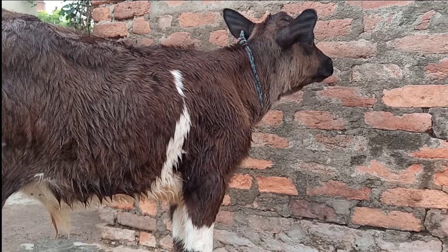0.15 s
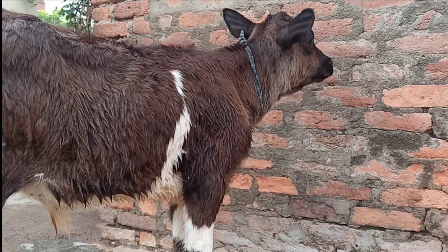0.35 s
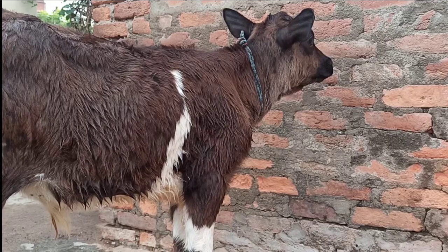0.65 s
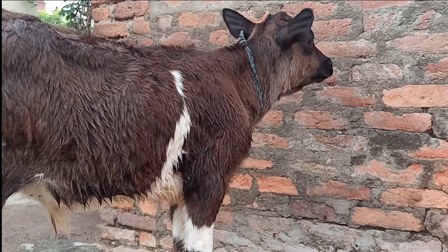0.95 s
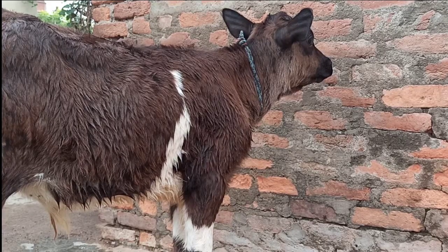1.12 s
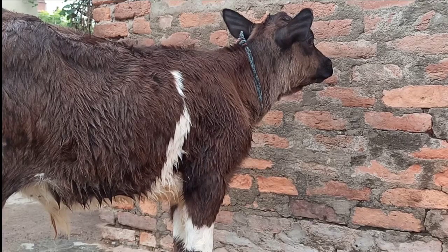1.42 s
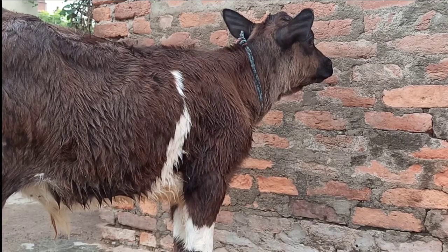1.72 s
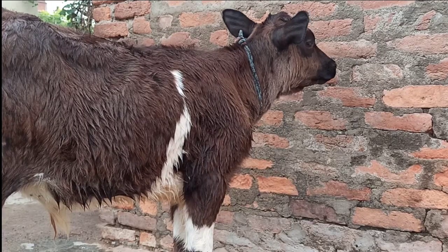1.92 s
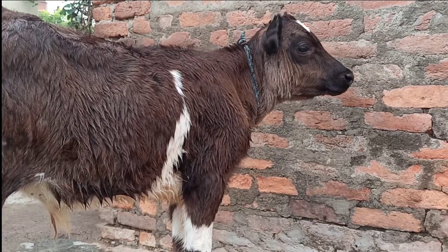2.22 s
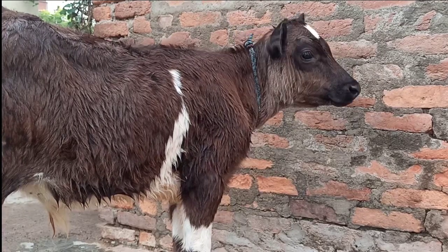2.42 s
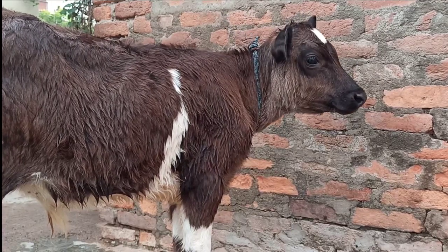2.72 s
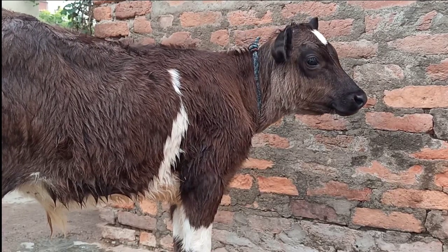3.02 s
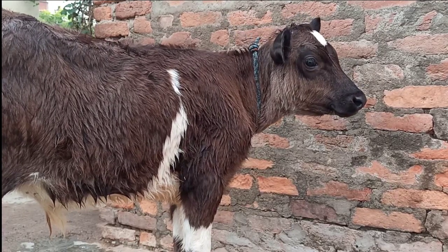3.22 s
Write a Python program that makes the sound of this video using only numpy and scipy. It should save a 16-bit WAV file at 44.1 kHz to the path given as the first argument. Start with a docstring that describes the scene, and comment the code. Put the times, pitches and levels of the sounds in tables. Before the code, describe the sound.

Close calf call, mouth shut, under a second long, reflecting lightly off a nearby wall; then a faint clink and rustle, sparse small birds, far soft hoots and a wavering low hum outdoors.

```python
"""Calf beside a brick wall

A calf calls once, mouth shut: a nasal harmonic tone and throat rasp in three pushes, with resonant noise as air
snorts through the nostrils and reflects nearby. Gliding sines make chirps, far chatter and hoots; shaped noise makes
rustles and the outdoor background; resonators excited by noise clink; a wavering low sine hums, swells and fades."""
import sys
import numpy as np
from scipy import signal
from scipy.fft import rfft, irfft
from scipy.io import wavfile
from scipy.ndimage import uniform_filter1d

SR = 44100
rng = np.random.default_rng(int(sys.argv[2]) if len(sys.argv) > 2 else 0)


def store_wav(level_fs):
    """Save 16-bit WAV to argv[1]."""
    pcm = np.round(np.clip(np.atleast_2d(level_fs), -1, 1) * 32767)
    wavfile.write(sys.argv[1], SR, pcm.T.astype(np.int16))


N = 147735
T = np.arange(N) / SR
HZ = np.maximum(np.arange(N // 2 + 1) * SR / N, 1)

# Outdoor background spectrum: f/Hz, relative level/dB
OUTDOOR_SPECTRUM = [(35, -32), (70, -14), (120, -3), (180, -7), (370, -11), (680, -13), (950, -21),
                    (1400, -23.5), (2800, -27), (4100, -25), (5400, -34), (6700, -26.5), (8000, -33.5),
                    (15500, -36.5)]
# Likeness of the two sides: f/Hz, correlation (-1 to 1)
SIDE_LIKENESS = [(130, 0.61), (300, 0.64), (640, 0.13), (1400, -0.24), (3000, -0.055), (15000, -0.077)]
# Strength of the hum: t/s, level/dB
HUM_LEVEL = [(.9, -74), (1.0, -58), (1.48, -60), (1.65, -67), (2.5, -70), (2.7, -55), (2.9, -63.5)]
# Bird chirps: start t/s, length t/s, first f/Hz, middle f/Hz, last f/Hz, level/dB, waver f/Hz
CHIRP_NOTES = [(-.02, 0.04, 3300, 3300, 3510, -54.5, 29.6), (.02, 0.061, 3620, 4260, 3930, -61, 80),
               (.962, 0.029, 6450, 6710, 6600, -57.5, 84), (.99, 0.068, 6670, 6590, 6660, -53, 108.7),
               (1.08, 0.053, 4060, 4580, 4510, -67, 303), (1.47, 0.13, 6670, 6550, 6630, -63, 225),
               (1.63, 0.087, 4140, 4060, 4140, -71.5, 218), (2.064, 0.057, 6600, 6960, 6760, -60, 150),
               (2.125, 0.064, 6780, 6750, 6660, -59, 129), (2.095, .135, 3335, 3510, 4700, -72, 333),
               (2.14, 0.13, 6500, 6200, 6080, -68.5, 398), (2.32, .08, 4470, 3845, 3310, -70.5, 199),
               (3.15, 0.1, 3900, 4100, 4330, -71.5, 344)]
# Fundamental of the calf's voice: t/s, f/Hz
VOICE_PITCH = [(.08, 322.4), (.11, 304.5), (.14, 318.6), (.18, 304.4), (.29, 312.3), (.32, 333.4),
               (.46, 323), (.5, 308.9), (.58, 298.3)]
# Strength of the voice: t/s, level/dB
VOICE_LEVEL = [(.078, -52.5), (.082, -21), (.096, -8.5), (.118, -22), (.141, -15.5), (.151, -21),
               (.163, -14.5), (.186, -19.5), (.194, -38), (.21, -25), (.246, -33), (.265, -18),
               (.275, -19.5), (.28, -28), (.288, -21.5), (.325, -24), (.342, -43), (.358, -26),
               (.41, -38.5), (.485, -41), (.502, -29.5), (.531, -26), (.575, -45), (.63, -58)]
# Harmonics of the voice: multiple of the fundamental, level/dB
VOICE_HARMONICS = [(1, -0.5), (2, -35.5), (3, -20.5)]
# Lift of the upper harmonics as the voice is pressed: t/s, level/dB
VOICE_PRESSURE = [(.1, -10.5), (.135, 2.5), (.16, 12), (.19, 3), (.26, -4), (.3, 9.5), (.36, -20),
                  (.5, -11)]
# Pushes of air: start t/s, attack t/s, hold until t/s, air level/dB, rasp level/dB, air tilt/(dB per octave)
AIR_PUSHES = [(0.079, 0.019, 0.17, -32, -24, -2.5), (0.273, 0.035, 0.39, -32.5, -35.5, -0.5),
              (0.485, 0.046, 0.5, -41, -49.5, -3)]
# Throat rasp spectrum: f/Hz, relative level/dB
RASP_SPECTRUM = [(50, -38.5), (110, -12), (170, -27.5), (230, 2.5), (350, 11.5), (410, -1), (490, 7.5),
                 (600, -5), (690, -1), (850, -8), (1050, -50), (2000, -54)]
# Nostril air spectrum: f/Hz, relative level/dB
AIR_SPECTRUM = [(600, -32), (1100, -38.5), (1400, 3), (1680, -29.5), (2100, -1.5), (2800, -8.5), (3600, 7),
                (4500, -2), (5750, -5.5), (6250, 7.5), (6800, 4.5), (7800, -1), (8450, -7), (9000, -28),
                (15500, -19)]
# Resonances of the nose: f/Hz, bandwidth f/Hz, level/dB
NOSE_RESONANCES = [(830, 22, -21.5), (938, 27, -17.5), (1325, 60, -14.5), (1524, 32, -24), (1815, 22, -20),
                   (2387, 52, -12), (2516, 53, -17), (3180, 12, -21), (3720, 220, -12.5)]
# Delay of each nostril's air at the left side: t/s
NOSTRIL_LAGS = [.00047, .00044]
# Balance of the calf's sound: f/Hz, left minus right level/dB
EAR_BALANCE = [(100, -1), (380, 1), (1300, 3), (2400, 5), (3500, -0.5), (4600, -5), (8000, -3.5),
               (15000, -1)]
# Rustles: start t/s, level/dB, tilt/(dB per octave)
RUSTLE_EVENTS = [(1.008, -52, 4.5), (1.47, -63.5, 6.5), (1.52, -56, 2), (2.4, -65, -9.5), (3.261, -65, 8.5)]
# Rustle spectrum: f/Hz, relative level/dB
RUSTLE_SPECTRUM = [(400, -7), (1200, -2), (2300, 9), (5000, -10), (6600, 13), (8400, -5.5), (15000, -13.5)]
# Resonances of the clink: f/Hz, level/dB
CLINK_RESONANCES = [(3900, -53), (5380, -55), (8400, -54.5)]
# Far hoots: start t/s, length t/s, first f/Hz, middle f/Hz, last f/Hz, level/dB, waver f/Hz
HOOT_NOTES = [(2.58, 0.11, 591, 634, 623, -66.5, 9.3), (2.84, 0.086, 680, 726, 642, -65.5, 8.9),
              (3.06, 0.055, 713, 760, 713, -63.5, 5.4), (3.2, 0.16, 628, 653, 608, -67, 16.4)]
# Edges of the lowered treble band: lower f/Hz, upper f/Hz
TREBLE_GAP = (8650, 11550)

OUTDOORS_DB = -56
HUM_HZ, HUM_WAVER_HZ, HUM_FLICKER_DB = 131.6, 4.98, 3
NOTE_EDGE_S, BIRD_T60_S, BIRD_ECHO_DB, BIRD_PAN_DB = 0.0017, 0.61, 0.5, -7
WAVER_RATE_RATIO = 2.18  # speed of a note's flutter over its depth
JITTER, SHIMMER_DB, ROUGH_PER_S = 0.011, 1.27, 110
VOICE_LOW_CUT_HZ, VOICE_LAG_S = 82, 0.00037
THROB_FROM_S, THROB_UNTIL_S, THROB_HZ = 0.43, 0.492, 41.9
GROWL_HZ, GROWL_JITTER, GROWL_UNEVEN_DB = 44.27, 0.006, 1.5
GROWL_SHARE = 0.65  # fraction of the rasp's power in the flaps
RASP_ATTACK_S, RASP_HOLD_S, RASP_RELEASE_DB_PER_S = 0.0022, 0.096, 152.5
AIR_PULSING, AIR_RELEASE_DB_PER_S = 0.23, 148
FLUTTER_DB, FLUTTER_PER_S = 0.74, 84
AIR_GROWL_DB = 1.43  # the throat's flaps also shake the air
SCATTER_T60_S, SCATTER_DB = 0.14, 0  # the wall and ground close by
YARD_T60_S, YARD_DB, VOICE_YARD_DB = 0.96, -13, -17
RUSTLE_ATTACK_S, RUSTLE_T60_S = 0.0054, 0.53
CLINK_S, CLINK_HOLD_S, CLINK_RELEASE_DB_PER_S = 1.009, 0.0076, 310
CLINK_WIDTH_HZ, CLINK_ECHO_DB, CLINK_PAN_DB = 76, -11, -10
CHATTER_FROM_S, CHATTER_NOTE_S, CHATTER_DB = 2.3, 0.0906, -74.5
CHATTER_LOW_HZ, CHATTER_HIGH_HZ, CHATTER_ROUGH_HZ = 3190, 4400, 79.7
GAP_DB, CUTOFF_HZ = -21, 15500


def from_db(db):
    """Logarithmic level: 20 dB is a tenfold amplitude."""
    return 10 ** (np.asarray(db) / 20)


def rms_one(x):
    """Power normalisation: the mean square becomes one."""
    return x / np.sqrt(np.mean(x ** 2) + 1e-20)


def curve(rows, outside=None):
    """Linear interpolation of a quantity in time."""
    return np.interp(T, *np.transpose(rows), left=outside, right=outside)


def across_hz(points):
    """Linear interpolation on a logarithmic frequency axis."""
    hz, value = np.transpose(points)
    return np.interp(np.log(HZ), np.log(hz), value)


def coloured(x, gain):
    """Linear filtering: each frequency component is multiplied by its gain."""
    return irfft(rfft(x) * gain, N)


def noise(spectrum):
    """Spectral shaping: white noise takes the given colour at unit power."""
    return rms_one(coloured(rng.standard_normal(N), from_db(across_hz(spectrum))))


def drift(rate):
    """Low-pass filtered chance: a smooth random fluctuation of unit spread."""
    return rms_one(coloured(rng.standard_normal(N), 1 / (1 + (HZ / rate) ** 2)))


def resonate(x, hz, width):
    """Resonance: a pole pair whose radius sets the bandwidth."""
    radius = np.exp(-np.pi * width / SR)
    poles = [1, -2 * radius * np.cos(2 * np.pi * hz / SR), radius * radius]
    return signal.lfilter([1, 0, -1], poles, x)


def push(start, attack, until, release):
    """Exponential decay: a linear rise and a hold, then a fall in dB proportional to time."""
    rise = np.clip((T - start) / attack, 0, 1)
    return rise * from_db(-release * np.maximum(T - until, 0))


def echoes(x, t60):
    """Diffuse reverberation: convolution with a decaying noise tail of unit energy, independent on each side."""
    tail = rng.standard_normal((2, SR)) * from_db(-60 * T[:SR] / t60)
    tail /= np.sqrt(np.sum(tail ** 2, axis=1, keepdims=True))
    return signal.fftconvolve(x[None], tail, axes=1)[:, :N]


def both_ears(x, lag):
    """Interaural delay: a linear phase shift makes the left side later."""
    left = coloured(x, np.exp(-2j * np.pi * HZ * lag))
    return np.array([left, x])


def panned(x, pan_db):
    """Level difference between the sides: positive values favour the left."""
    return x * from_db([[pan_db / 2], [-pan_db / 2]])


def outdoors():
    """Partial coherence: the sides share the bass of a steady noise and differ in its treble."""
    alike = np.clip(across_hz(SIDE_LIKENESS), -1, 1)
    mid = coloured(noise(OUTDOOR_SPECTRUM), np.sqrt(1 + alike))
    side = coloured(noise(OUTDOOR_SPECTRUM), np.sqrt(1 - alike))
    return from_db(OUTDOORS_DB) * rms_one(np.array([mid + side, mid - side]))


def hum():
    """Frequency and amplitude modulation: a low sine wavers and flickers, as of a far engine."""
    phase = 2 * np.pi * np.cumsum(HUM_HZ + HUM_WAVER_HZ * drift(13.4)) / SR
    level_db = curve(HUM_LEVEL) + HUM_FLICKER_DB * drift(19)
    return np.sqrt(2) * np.sin(phase) * from_db(level_db)


def whistles(notes, pan_db):
    """Frequency modulation: each sine bends through three pitches, wavers, and echoes round the yard."""
    out = np.zeros(N)
    chance = rfft(rng.standard_normal(N))
    for start, length, first, middle, last, db, rough in notes:
        progress = np.clip((T - start) / length, 0, 1)
        waver = rms_one(irfft(chance / (1 + (HZ / (WAVER_RATE_RATIO * rough)) ** 2), N))
        bend = np.polyfit([0, .5, 1], [first, middle, last], 2)
        hz = np.polyval(bend, progress) + rough * waver
        envelope = np.clip(np.minimum(progress, 1 - progress) * length / NOTE_EDGE_S, 0, 1)
        out += np.sqrt(2) * from_db(db) * envelope * np.sin(2 * np.pi * np.cumsum(hz) / SR)
    return panned(out + from_db(BIRD_ECHO_DB) * echoes(out, BIRD_T60_S), pan_db)


def chirps():
    """Gliding tones: small birds chirp, stronger on the right."""
    return whistles(CHIRP_NOTES, BIRD_PAN_DB)


def throb():
    """Amplitude modulation: a rectified sine breaks the voice into beats as the second push runs out."""
    catching = (T > THROB_FROM_S) & (T < THROB_UNTIL_S)
    beats = np.abs(np.sin(np.pi * THROB_HZ * (T - THROB_FROM_S)))
    return uniform_filter1d(np.where(catching, beats, 1), size=200)


def voice_phase():
    """Jitter: the phase integrates a gliding pitch with small random deviations."""
    return 2 * np.pi * np.cumsum(curve(VOICE_PITCH) * (1 + JITTER * drift(ROUGH_PER_S))) / SR


def voice(phase):
    """Harmonic synthesis: a nearly pure tone whose partials shimmer and whose overtones follow the pressing."""
    tone = np.zeros(N)
    for multiple, db in VOICE_HARMONICS:
        pressing = (multiple > 1.5) * curve(VOICE_PRESSURE)
        level_db = db + pressing + SHIMMER_DB * drift(ROUGH_PER_S)
        tone += from_db(level_db) * np.sin(round(multiple) * phase)
    return np.sqrt(2) * tone * throb() * from_db(curve(VOICE_LEVEL, -120))


def growl():
    """Pulse excitation: slow uneven flaps of the throat join turbulence of the same colour."""
    cycles = np.cumsum(GROWL_HZ * (1 + GROWL_JITTER * drift(34))) / SR
    pulses = np.diff(np.floor(cycles), prepend=0) * from_db(GROWL_UNEVEN_DB * drift(29))
    flaps = rms_one(coloured(pulses, from_db(across_hz(RASP_SPECTRUM))))
    share = np.clip(GROWL_SHARE, 0, 1)
    return np.sqrt(share) * flaps + np.sqrt(1 - share) * noise(RASP_SPECTRUM)


def throat_rasp():
    """Gated excitation: each push opens and releases the growl."""
    gate = sum(from_db(db) * push(start, RASP_ATTACK_S, start + RASP_HOLD_S, RASP_RELEASE_DB_PER_S)
               for start, _, _, _, db, _ in AIR_PUSHES)
    return growl() * gate


def nostril_air(phase, flutter):
    """Turbulence and resonance: noise pulses with the voice, joins the ringing nose, and is tilted by each push."""
    nose = sum(from_db(db) * rms_one(resonate(rng.standard_normal(N), hz, width))
               for hz, width, db in NOSE_RESONANCES)
    flow = (noise(AIR_SPECTRUM) * (1 + AIR_PULSING * np.cos(phase)) + nose) / np.sqrt(2)
    air = np.zeros(N)
    for start, attack, until, db, _, brightness in AIR_PUSHES:
        tilt = from_db(db + brightness * np.log2(HZ / 4000))
        air += coloured(flow, tilt) * push(start, attack, until, AIR_RELEASE_DB_PER_S)
    return flutter * air


def calf():
    """Superposition: voice, rasp and the air of two nostrils combine with their reflections."""
    phase = voice_phase()
    tone = voice(phase)
    rasp = throat_rasp()
    low_cut = signal.butter(2, VOICE_LOW_CUT_HZ, "high", fs=SR, output="sos")
    throat = signal.sosfilt(low_cut, tone + rasp)
    to_yard = from_db(YARD_DB) * rasp + from_db(VOICE_YARD_DB) * tone
    sound = both_ears(throat, VOICE_LAG_S) + echoes(to_yard, YARD_T60_S)
    shaking_db = AIR_GROWL_DB * np.cos(2 * np.pi * GROWL_HZ * T)
    flutter = from_db(FLUTTER_DB * drift(FLUTTER_PER_S) + shaking_db)
    for lag in NOSTRIL_LAGS:
        air = nostril_air(phase, flutter)
        sound += both_ears(air, lag)
        sound += from_db(SCATTER_DB) * echoes(air, SCATTER_T60_S)
        sound += from_db(YARD_DB) * echoes(air, YARD_T60_S)
    return coloured(sound, from_db(np.outer([.5, -.5], across_hz(EAR_BALANCE))))


def rustles():
    """Transient noise: soft hisses rise quickly and decay, each with its own spectral tilt."""
    hiss = np.array([noise(RUSTLE_SPECTRUM), noise(RUSTLE_SPECTRUM)])
    octaves = np.log2(np.maximum(HZ, 1000) / 4000)  # the tilt is level below 1 kHz
    return sum(coloured(hiss, from_db(db + brightness * octaves))
               * push(start, RUSTLE_ATTACK_S, start, 60 / RUSTLE_T60_S)
               for start, db, brightness in RUSTLE_EVENTS)


def clink():
    """Inharmonic resonance: unrelated modes jangle briefly at the right, as of a tether, and echo."""
    tones = sum(from_db(db) * rms_one(resonate(rng.standard_normal(N), hz, CLINK_WIDTH_HZ))
                for hz, db in CLINK_RESONANCES)
    ring = tones * push(CLINK_S, NOTE_EDGE_S, CLINK_S + CLINK_HOLD_S, CLINK_RELEASE_DB_PER_S)
    return panned(ring + from_db(CLINK_ECHO_DB) * echoes(ring, BIRD_T60_S), CLINK_PAN_DB)


def chatter(count=14):
    """Random sequence: far birds' faint notes fall in successive time slots, each with its own pitch and bend."""
    slot = (T[-1] - CHATTER_FROM_S) / count
    notes = []
    for k, (late, pitch, bend) in enumerate(rng.random((count, 3))):
        start = CHATTER_FROM_S + (k + late) * slot
        hz = CHATTER_LOW_HZ + pitch * (CHATTER_HIGH_HZ - CHATTER_LOW_HZ)
        glide = CHATTER_ROUGH_HZ * (2 * bend - 1)
        notes.append((start, CHATTER_NOTE_S, hz - glide, hz, hz + glide, CHATTER_DB, CHATTER_ROUGH_HZ))
    return whistles(notes, 0)


def hoots():
    """Gliding tones: low notes hoot far off, equally strong on both sides before their echoes."""
    return whistles(HOOT_NOTES, 0)


def scene():
    """Superposition: the calf close by and everything else behind add linearly."""
    return calf() + chirps() + hoots() + chatter() + clink() + rustles() + hum() + outdoors()


def record(dry):
    """Band limitation: one treble band is lowered and the top is cut steeply."""
    gap = (HZ > TREBLE_GAP[0]) & (HZ < TREBLE_GAP[1])
    gain = from_db(GAP_DB * gap) * (HZ < CUTOFF_HZ)
    return coloured(dry, uniform_filter1d(gain, size=500))  # soften the band edges


dry = scene()
out = record(dry)
store_wav(out)
```